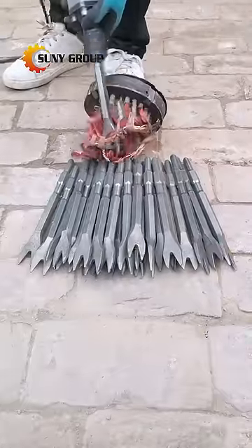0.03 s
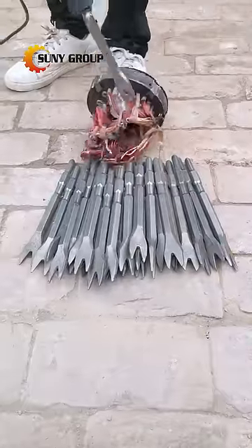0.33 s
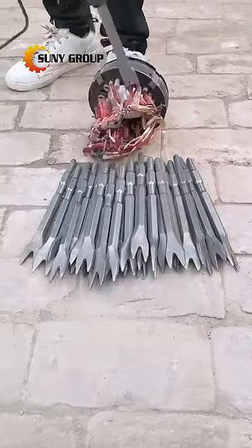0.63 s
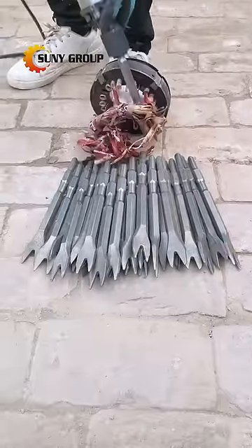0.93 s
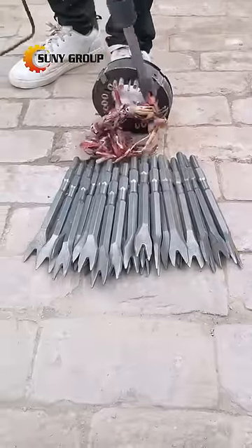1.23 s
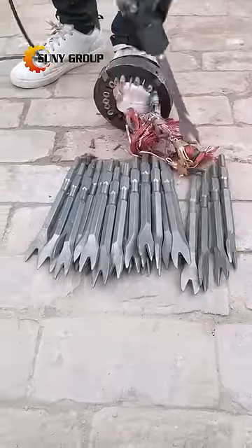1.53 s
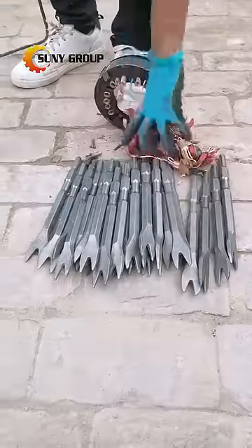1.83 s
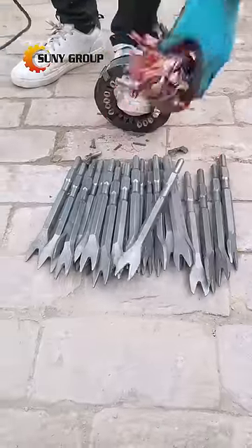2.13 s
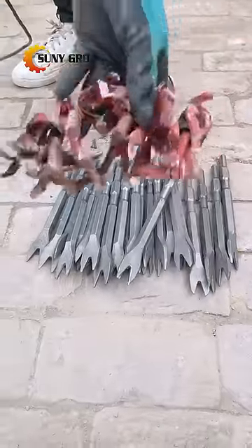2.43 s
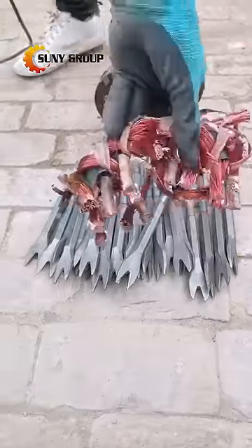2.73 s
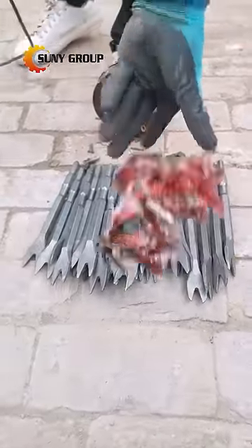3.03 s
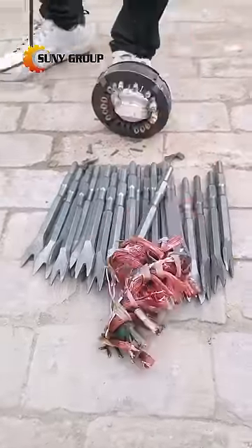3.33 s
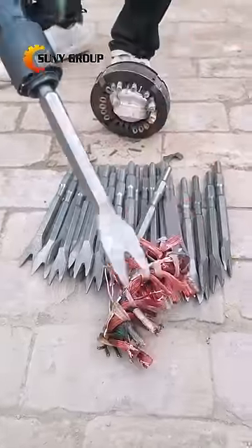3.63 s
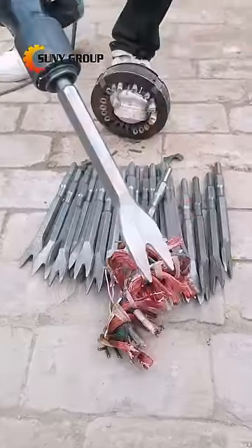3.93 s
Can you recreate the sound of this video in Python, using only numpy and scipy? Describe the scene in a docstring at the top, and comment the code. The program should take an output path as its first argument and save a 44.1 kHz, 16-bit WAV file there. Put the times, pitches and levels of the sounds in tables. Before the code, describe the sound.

Close by outdoors, an electric chisel cuts copper winding with three brief bursts of sharp blows, each trailed by a falling whirr. The wire is pulled loose and dropped on jangling steel chisels before the bit scrapes and clicks.

```python
"""Sharp hammer blows over a motor whirr: an electric chisel cuts the copper winding off a motor
stator on outdoor paving, in three short bursts. After each, its motor and gears coast down in pitch.
The winding crunches as it is pulled free and dropped on spare steel chisels, which clink and jangle.
Last, the loose bit scrapes and rattles in its holder as the tool is lifted.
A low outdoor rumble lies underneath."""
import sys
import numpy as np
from scipy import signal
from scipy.fft import rfft, irfft, next_fast_len
from scipy.io import wavfile
from scipy.ndimage import map_coordinates

SR = 44100
rng = np.random.default_rng(int(sys.argv[2]) if len(sys.argv) > 2 else 0)


def generate_wav(sig):
    """Save sig (samples, or channels by samples) to the path in sys.argv[1] as 16-bit PCM at SR."""
    pcm = np.round(np.clip(np.atleast_2d(sig).T, -1, 1) * 32767).astype(np.int16)
    wavfile.write(sys.argv[1], SR, pcm)


N = 176400
TIME_S = np.arange(N) / SR
AGE_S = TIME_S[:SR // 3]  # time since a contact


def amp(db):
    """Decibels to gain."""
    return 10 ** (np.asarray(db) / 20)


def unit(x):
    """Scale to rms 1."""
    return x / np.sqrt(np.mean(x ** 2) + 1e-20)


def at_hz(points, hz):
    """Interpolate (Hz, value) points on a log frequency axis."""
    knots_hz, values = np.transpose(points)
    return np.interp(np.log(hz + 1), np.log(knots_hz + 1), values)


def curve(points):
    """Interpolate (s, value) points at every sample."""
    return np.interp(TIME_S, *np.transpose(points))


def wobble(rate_hz):
    """Smooth random curve with rate_hz knots a second."""
    knots = rng.standard_normal(int(4 * rate_hz) + 8)
    return map_coordinates(knots, [TIME_S * rate_hz], mode="mirror")


def filtered(x, response):
    """Apply a frequency response, given as a function of Hz."""
    size = next_fast_len(x.shape[-1] + 4096)
    hz = np.fft.rfftfreq(size, 1 / SR)
    return irfft(rfft(x, size) * response(hz), size)[..., :x.shape[-1]]


# Each row: frequency in Hz, left-right correlation.
STEREO_CORRELATION = [(60, 0.64), (250, 0.84), (600, 0.56), (1200, 0), (2500, 0.37), (5000, 0), (12000, 0)]
def noise(spectrum):
    """Coloured stereo noise of rms 1, alike in the bass and unrelated in the treble."""
    def mid_side_gains(hz):
        angle = np.arccos(np.clip(at_hz(STEREO_CORRELATION, hz), -1, 1)) / 2
        return amp(at_hz(spectrum, hz)) * [np.cos(angle), np.sin(angle)]
    mid, side = filtered(rng.standard_normal((2, N)), mid_side_gains)
    return unit(np.array([mid + side, mid - side]))


def panned(x, points):
    """Pan along (s, left minus right dB) points."""
    return x * amp(np.outer([.5, -.5], curve(points)))


def add(track, start_s, x):
    """Mix x into the track in place."""
    part = track[..., max(0, round(start_s * SR)):][..., :x.shape[-1]]
    part += x[..., :part.shape[-1]]


def bursts(events, spectrum, rise_s, hold_s, rough_db):
    """Rough noise that rises, holds and decays for each (start s, level dB, T60 s) event."""
    envelope = np.zeros(N)
    attack = 1 - np.exp(-AGE_S / rise_s)
    for start_s, db, t60_s in events:
        decay_db = 60 * np.maximum(AGE_S - hold_s, 0) / t60_s
        add(envelope, start_s, amp(db - decay_db) * attack)
    return envelope * noise(spectrum) * unit(amp(rough_db * wobble(900)))


def ring(modes, tuning, detune):
    """Struck steel: decaying modes, mixed anew for each contact and channel."""
    hz, db, t60_s = np.transpose(modes)[:, :, None]
    shape = (2, len(modes), 1)
    hz = hz * tuning * (1 + detune * rng.standard_normal(hz.shape))
    db = db + rng.uniform(-3, 3, shape)
    waves = np.sin(2 * np.pi * (hz * AGE_S + rng.random(shape)))
    attack = 1 - np.exp(-AGE_S / .00084)
    return (waves * amp(db - 60 * AGE_S / t60_s)).sum(1) * attack


def resonate(drive, modes, half_width_hz):
    """Continuously driven steel: resonances of equal width, output at rms 1."""
    def response(hz):
        return sum(amp(db) / (1 + 1j * (hz - mode_hz) / half_width_hz) for mode_hz, db, _ in modes)
    return unit(filtered(drive, response))


# Each row: on in seconds, off in seconds.
TRIGGER_S = [(0, .245), (.805, 1.05), (1.39, 1.62)]
def shaft_speed(full_hz=507.0, spin_up_s=.05, coast_s=.46):
    """Shaft rate in Hz: starts at full speed, coasts on release, spins up on the trigger."""
    hz = np.full(N, full_hz)
    for on_s, off_s in TRIGGER_S:
        gap_hz = np.interp(on_s, TIME_S, hz) - full_hz
        rising_hz = full_hz + gap_hz * np.exp(-abs(TIME_S - on_s) / spin_up_s)
        hz = np.where(TIME_S > on_s, rising_hz, hz)
        falling_hz = np.interp(off_s, TIME_S, hz) * np.exp(-abs(TIME_S - off_s) / coast_s)
        hz = np.where(TIME_S > off_s, falling_hz, hz)
    return hz


# Each row: multiple of shaft rate, relative level in dB.
GEAR_FAN_ORDERS = [(2, -6), (3, -9), (4, -2), (5.3, -4), (6.5, -6), (8, 0), (9.4, -8), (10.8, -4), (12, -3),
                   (14.4, -5), (16, -3), (20, -8), (24, -9)]
# Each row: frequency in Hz, relative gain in dB.
GEARBOX_RESPONSE = [(200, -24), (450, -13), (650, 0), (850, 0), (1050, -5), (1250, -4), (1450, -7),
                    (1700, 2), (1900, -3), (2100, 1), (2550, 2), (2900, -5), (3600, -5), (4000, -8),
                    (4400, -3), (5000, -11), (7000, -12), (9000, -20)]
HOUSING_SPECTRUM = [(53, -62.5), (90, -42), (183, -15), (320, -7), (430, -14), (612, 1.5), (850, -1.5),
                    (1200, -5.5), (1750, -1), (2450, -2), (3500, -2), (4100, -5), (4840, -2.5), (5630, -8),
                    (6980, -7.5), (8300, -15.5), (10300, -15), (13500, -28.5), (15500, -56)]
# Each row: time in seconds, level in dB.
WHIRR_LEVEL_DB = [(0, -41.5), (.23, -41), (.35, -30.5), (.55, -33.5), (.81, -35.5), (.83, -43.5),
                  (1.0, -37), (1.12, -31), (1.38, -35), (1.4, -46), (1.51, -38.5), (1.61, -30.5),
                  (1.8, -34), (2.0, -35.5), (2.18, -40), (2.28, -44.5), (2.33, -51), (2.39, -46.5),
                  (2.45, -69), (2.52, -74)]
# Each row: time in seconds, left minus right in dB.
WHIRR_PAN_DB = [(0, -4), (.5, -3.5), (1.2, -.5), (1.7, 0), (2.4, 0)]
def whirr(tones_db=-2.5, fade_db=2.6, chatter_db=2.0, grind_db=1.1, flutter_db=1.1):
    """Rough gear and fan tones and tooth chatter follow the shaft, radiated by gearbox and housing."""
    shaft_hz = shaft_speed()
    turns = np.cumsum(shaft_hz) / SR
    tones = np.zeros((2, N))
    for order, db in GEAR_FAN_ORDERS:
        phase = 2 * np.pi * (order * turns + rng.random((2, 1)))
        width_hz = 24 * order ** .85
        gain = amp(db + fade_db * wobble(30) + at_hz(GEARBOX_RESPONSE, order * shaft_hz))
        tone = np.cos(phase) * (.5 + wobble(width_hz / 2)) + np.sin(phase) * wobble(2 * width_hz)
        tones += gain * tone
    teeth_db = chatter_db * (np.sin(2 * np.pi * turns) + wobble(500))
    chatter = unit(amp(teeth_db + grind_db * wobble(170))) * noise(HOUSING_SPECTRUM)
    envelope = amp(curve(WHIRR_LEVEL_DB) + flutter_db * wobble(70))
    return panned(envelope * (chatter + amp(tones_db) * unit(tones)), WHIRR_PAN_DB)


# Each row: nominal frequency in Hz, relative level in dB, T60 in seconds when struck.
BIT_MODES = [(1750, -17, 0.12), (2950, -15, 0.073), (4430, -13.5, 0.043), (4906, 8.5, 0.017),
             (7205, 4.5, 0.037), (10700, -13.5, 0.044), (10340, -10, 0.04), (14500, -15, .02)]
def loose_bit(relative_db=-14, swing_db=4.5):
    """The bit jingles in fits against its holder, following the whirr's level."""
    taps = rng.standard_normal((2, N)) * amp(swing_db * wobble(45))
    return amp(curve(WHIRR_LEVEL_DB) + relative_db) * resonate(taps, BIT_MODES, half_width_hz=70)


# Each row: start in seconds, level in dB, ring and sizzle in dB re that level, ground offset in dB.
HAMMER_BLOWS = [(.004, -30, 1.5, -9.5, -3), (0.0273, -23, -11.5, -7, -3), (0.049, -19.5, -3.5, -20.5, 1.5),
                (0.0719, -20, -4, -13.5, -8.5), (0.0948, -24.5, -11, -8, -0.5),
                (0.1188, -21.5, -7.5, -12.5, 5.5), (.143, -21, -9, -7, 1), (0.1659, -23, -3.5, -7, 0),
                (.188, -25.5, -11, -8, -3), (0.2104, -25.5, 1, -6.5, 5), (0.8169, -22, 7, -7.5, 6),
                (0.8452, -24, -9.5, -8, -4), (0.8727, -26.5, -2.5, -5, -8), (0.8977, -33.5, -6, -5, -13),
                (0.9156, -33, 1, -2, -8), (.952, -27.5, -7, -7, -10), (0.9713, -31, -3.5, 3.5, -9),
                (.992, -35, 3, -4.5, -9), (1.3947, -26, 6, -6, 3), (1.4316, -28, 4, -6.5, 6.5),
                (1.46, -28.5, -7, -8, -21), (1.4649, -22.5, -2.5, -6.5, 0.5), (1.497, -31.5, -0.5, -2, -14)]
# Each row: frequency in Hz, relative level in dB.
CRACK_SPECTRUM = [(100, -0.5), (300, -4), (900, -7), (2000, -3), (4500, 5), (6200, 1), (8500, -2),
                  (10800, -2.5), (11800, -13), (15500, -29.5)]
SIZZLE_SPECTRUM = [(6000, -42), (9600, -26), (10150, -8), (10400, -9), (10580, 0), (10780, 0), (11050, -13),
                   (11700, -34), (12800, -30), (13500, -18), (14500, -38)]
PAVING_SPECTRUM = [(20, -2.5), (42, 1.5), (80, -7.5), (140, -12.5), (300, -32.5), (1000, -70.5)]
# Each row: time in seconds, left minus right in dB.
BLOW_PAN_DB = [(0, -3), (0.202, -2.5), (0.848, 0.5), (1.45, -2.5)]
def hammer(crack_t60_s=.018, sizzle_t60_s=.06, rumble_t60_s=.16, rumble_db=-44.5, thump_db=-34):
    """Each blow cracks, rings the bit, sizzles its tip on copper and thumps the stator on the paving."""
    cracks = [(s, db, crack_t60_s) for s, db, *_ in HAMMER_BLOWS]
    sizzles = [(s, db + sizzle_db, sizzle_t60_s) for s, db, _, sizzle_db, _ in HAMMER_BLOWS]
    rumbles = [(s, rumble_db + ground_db, rumble_t60_s) for s, *_, ground_db in HAMMER_BLOWS]
    steel = bursts(cracks, CRACK_SPECTRUM, rise_s=.00084, hold_s=.0034, rough_db=1.5)
    steel += bursts(sizzles, SIZZLE_SPECTRUM, rise_s=.001, hold_s=.0012, rough_db=2.5)
    ground = bursts(rumbles, PAVING_SPECTRUM, rise_s=.004, hold_s=.005, rough_db=2.5)
    push_age = AGE_S / .0028  # in time constants
    thump = -push_age * np.exp(1 - push_age) * (1 - push_age / 7)
    for start_s, db, ring_db, _, ground_db in HAMMER_BLOWS:
        add(steel, start_s, amp(db + ring_db) * ring(BIT_MODES, tuning=.99, detune=.005))
        add(ground, start_s, amp(thump_db + ground_db) * thump)
    return panned(steel, BLOW_PAN_DB) + ground * amp([[1.5], [-1.5]])


def yard_echo(x, t60_s=.14, delay_s=.003):
    """Paving and walls return a short diffuse tail."""
    tail = rng.standard_normal((2, len(AGE_S))) * amp(-60 * AGE_S / t60_s) * (AGE_S > delay_s)
    return signal.fftconvolve(x, tail / np.linalg.norm(tail[0]), axes=1)[:, :N]


# Each row: frequency in Hz, relative level in dB.
AIR_SPECTRUM = [(25, -2), (70, -6), (130, -11), (240, -9), (420, -21.5), (700, -20), (1350, -26.5),
                (2500, -37), (4800, -28), (6500, -45.5), (10000, -41.5), (15000, -51.5)]
# Each row: time in seconds, level in dB.
AIR_LEVEL_DB = [(0, -88.5), (2.5, -59.5), (3.1, -61), (3.5, -61), (3.8, -55), (4, -60.5)]
def outdoor_air():
    """A faint low rumble fades in."""
    return amp(curve(AIR_LEVEL_DB)) * noise(AIR_SPECTRUM)


# Each row: start in seconds, level in dB, T60 in seconds, knock offset in dB.
COPPER_CRUNCHES = [(1.95, -25.5, 0.0479, -7.5), (2.17, -33.5, 0.058, -5.5), (2.187, -35, 0.041, 2),
                   (2.2955, -24.5, 0.028, -5), (2.302, -32.5, 0.023, -1.5), (2.389, -36, 0.02, -4.5),
                   (3.137, -59, 0.079, -23), (3.2035, -20, 0.05, -3.5), (3.226, -35, 0.11, -11),
                   (3.253, -42, 0.077, -4), (3.277, -39, 0.042, -0.5)]
# Each row: frequency in Hz, relative level in dB.
COPPER_SPECTRUM = [(150, -42), (400, -9.5), (700, -4), (1200, -3), (3000, 4), (6000, -6), (11000, -10),
                   (15000, -30)]
KNOCK_SPECTRUM = [(50, -44), (125, -3), (200, -5.5), (320, 6), (450, -3), (650, 3), (950, -9), (1250, -5),
                  (4000, -52)]
# Each row: start in seconds, level in dB, tuning factor, tilt in dB per octave about 5 kHz.
SPARE_CLINKS = [(2.087, -32.5, 1.004, -8.5), (2.223, -31.5, 1.02, 2.5), (2.259, -37, 1.03, 19),
                (3.202, -34, .99, 3), (3.279, -36.5, 1.005, -1.5)]
# Each row: nominal frequency in Hz, relative level in dB, T60 in seconds when struck.
SPARE_MODES = [(2865, 2.5, 0.076), (2972, 3.5, 0.055), (4786, 4.5, 0.066), (4970, 0.5, 0.13),
               (5490, -5.5, 0.16), (6880, -4, 0.13), (7800, -13, 0.093), (8720, -9, 0.037),
               (9700, -21, 0.16), (11700, -28, 0.1)]
def winding():
    """The copper bundle crunches, knocks and sets the spare chisels clinking."""
    crunches = [row[:3] for row in COPPER_CRUNCHES]
    knocks = [(s, db + knock_db, t60_s) for s, db, t60_s, knock_db in COPPER_CRUNCHES]
    out = bursts(crunches, COPPER_SPECTRUM, rise_s=.0012, hold_s=.0015, rough_db=4)
    out += bursts(knocks, KNOCK_SPECTRUM, rise_s=.0016, hold_s=.0018, rough_db=3)
    for start_s, clink_db, tuning, tilt in SPARE_CLINKS:
        modes = [(hz, db + tilt * np.log2(hz / 5000), t60_s) for hz, db, t60_s in SPARE_MODES]
        add(out, start_s, amp(clink_db) * ring(modes, tuning, detune=.0036))
    return out


# Each row: time in seconds, level in dB.
JANGLE_LEVEL_DB = [(1.95, -83), (2.04, -44.5), (2.1, -38), (2.16, -39.5), (2.24, -34.5), (2.31, -39.5),
                   (2.34, -55.5), (2.39, -69), (2.46, -82), (2.55, -96), (3.19, -88.5), (3.206, -20.5),
                   (3.23, -37), (3.285, -38.5), (3.33, -81), (3.4, -97.5)]
def jangle(rough_db=5):
    """Scraping copper keeps the spare chisels ringing grittily."""
    grit = rng.standard_normal((2, N)) * amp(rough_db * (wobble(700) + wobble(90)))
    return amp(curve(JANGLE_LEVEL_DB)) * resonate(grit, SPARE_MODES, half_width_hz=28)


# Each row: centre in seconds, Gaussian width in seconds, level in dB.
HANDLING_SWISHES = [(2.58, 0.021, -60.5), (3.67, 0.032, -61), (3.88, 0.025, -69)]
# Each row: frequency in Hz, relative level in dB.
SWISH_SPECTRUM = [(1000, -28), (2800, -17), (4200, -1.5), (5500, -24), (12000, -39)]
def swishes():
    """Handling makes soft, brief swells of hiss."""
    swells = [amp(db) * np.exp(-((TIME_S - s) / width_s) ** 2 / 2) for s, width_s, db in HANDLING_SWISHES]
    return noise(SWISH_SPECTRUM) * sum(swells)


# Each row: time in seconds, level in dB.
SLIDE_LEVEL_DB = [(3.39, -98), (3.408, -55.5), (3.428, -56.5), (3.435, -44), (3.448, -43.5), (3.459, -36.5),
                  (3.468, -37.5), (3.485, -52.5), (3.52, -97)]
# Each row: frequency in Hz, bandwidth in Hz, relative gain in dB.
SLIDE_RESONANCES = [(1353, 90, 3), (7000, 150, -11.5), (8240, 140, -6.5)]
def bit_slide(stop_s=3.469, rough_db=3.3):
    """The bit scrapes down its holder and rings when it meets the stop."""
    def response(hz):
        return sum(amp(db) * 1j * hz * width_hz / (mode_hz ** 2 - hz ** 2 + 1j * hz * width_hz)
                   for mode_hz, width_hz, db in SLIDE_RESONANCES)
    grit = rng.standard_normal((2, N)) * amp(rough_db * wobble(600))
    out = amp(curve(SLIDE_LEVEL_DB)) * unit(filtered(grit, response))
    # Each row: frequency in Hz, level in dB, T60 in seconds.
    stop_modes = [(4820, -35.5, .11), (5750, -48, .08)]
    add(out, stop_s, ring(stop_modes, tuning=1, detune=.0026))
    return out


# Each row: start in seconds, level in dB, T60 in seconds, ring offset in dB, knock offset in dB.
BIT_CONTACTS = [(3.431, -44.5, 0.04, -3, -1), (3.44, -45, 0.026, -1, 10), (3.452, -28, 0.039, -20, -24),
                (3.465, -47, 0.013, -10, 7), (3.469, -21.5, 0.017, -32, -26), (3.472, -39, .06, -14, -33),
                (3.548, -46.5, .025, -23, -30), (3.583, -48, 0.08, -2.5, -27),
                (3.609, -38.5, 0.053, 0.5, -34), (3.696, -52, 0.051, 4, -0.5), (3.71, -60, 0.072, 11.5, 6),
                (3.734, -58, 0.037, 8.5, 2), (3.765, -73, 0.058, 11.5, -21), (3.828, -71.5, 0.091, 9, -12)]
# Each row: frequency in Hz, relative level in dB.
CLICK_SPECTRUM = [(200, -50), (700, -6), (1600, -4.5), (4500, -0.5), (7000, -3.5), (10000, -8.5),
                  (15000, -29)]
# Each row: frequency in Hz before tuning, relative level in dB, T60 in seconds.
HOLDER_MODES = [(1417, 4, 0.035), (1770, 6, 0.03), (2020, 5.5, 0.028), (2550, 5.5, 0.028), (3486, 0, 0.025),
                (4740, -14, 0.1), (5710, -8, 0.035), (8900, -18, .035)]
def bit_rattle():
    """The bit clicks, knocks and rings in its holder as the tool is lifted."""
    clicks = [row[:3] for row in BIT_CONTACTS]
    knocks = [(s, db + knock_db, t60_s) for s, db, t60_s, _, knock_db in BIT_CONTACTS]
    out = bursts(clicks, CLICK_SPECTRUM, rise_s=.0015, hold_s=.002, rough_db=2.5)
    out += bursts(knocks, KNOCK_SPECTRUM, rise_s=.0031, hold_s=.0025, rough_db=2)
    for start_s, db, _, ring_db, _ in BIT_CONTACTS:
        add(out, start_s, amp(db + ring_db) * ring(HOLDER_MODES, tuning=.93, detune=.043))
    return out


# Each row: time in seconds, left minus right in dB.
HANDLING_PAN_DB = [(3.45, -1.5), (3.6, 1)]
def scene(echo_db=-13):
    """Tool and metal in the yard, over a low outdoor rumble."""
    near = whirr() + loose_bit() + hammer() + winding() + jangle()
    near += panned(bit_rattle() + swishes() + bit_slide(), HANDLING_PAN_DB)
    return near + amp(echo_db) * yard_echo(near) + outdoor_air()


def record(dry):
    """Brick-wall low-pass at 15.8 kHz."""
    return filtered(dry, lambda hz: hz < 15800)


dry = scene()
out = record(dry)
generate_wav(out)
```